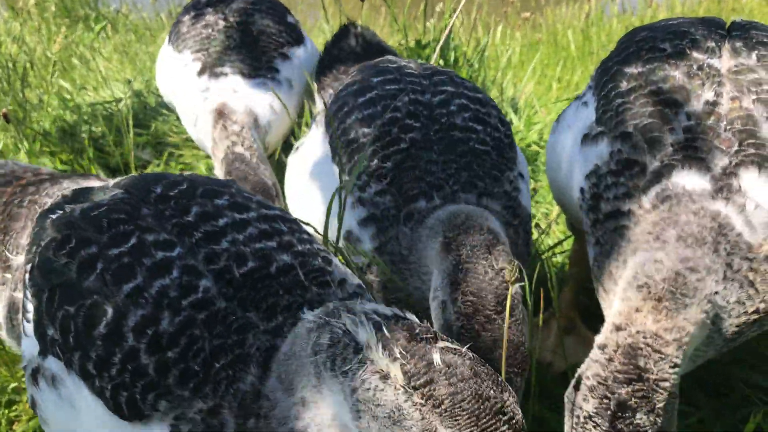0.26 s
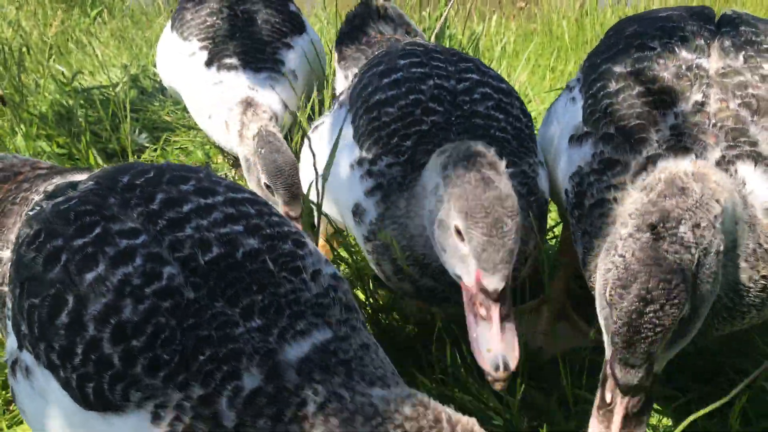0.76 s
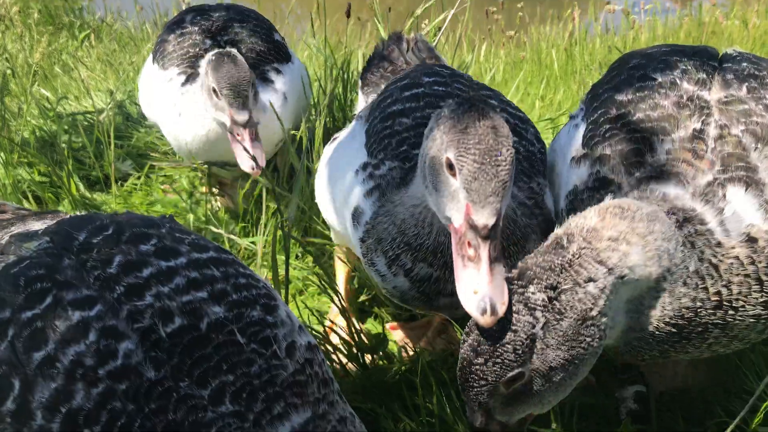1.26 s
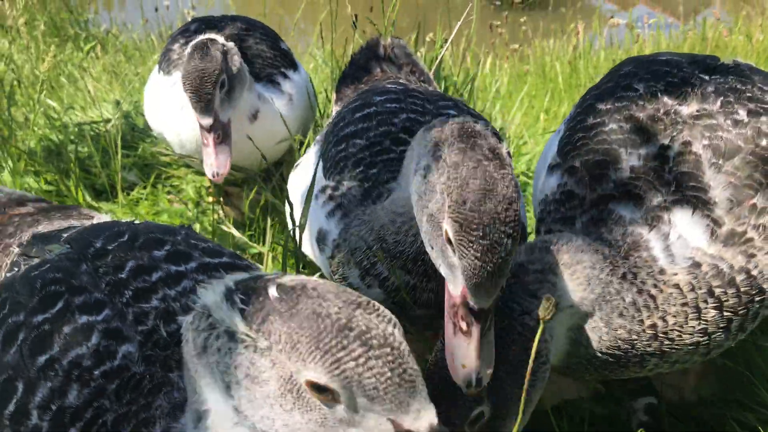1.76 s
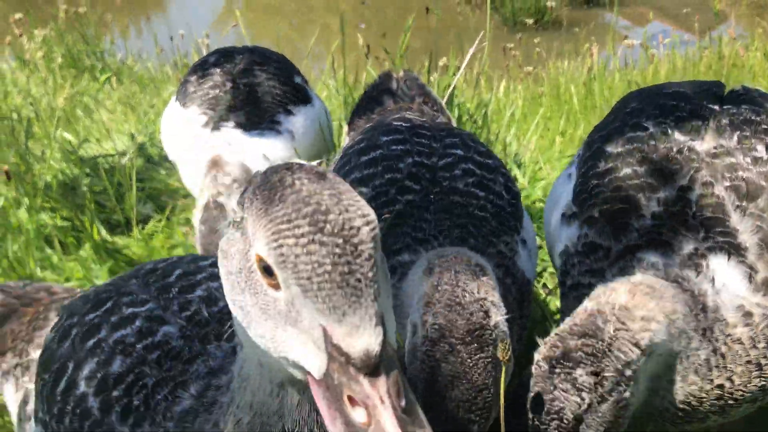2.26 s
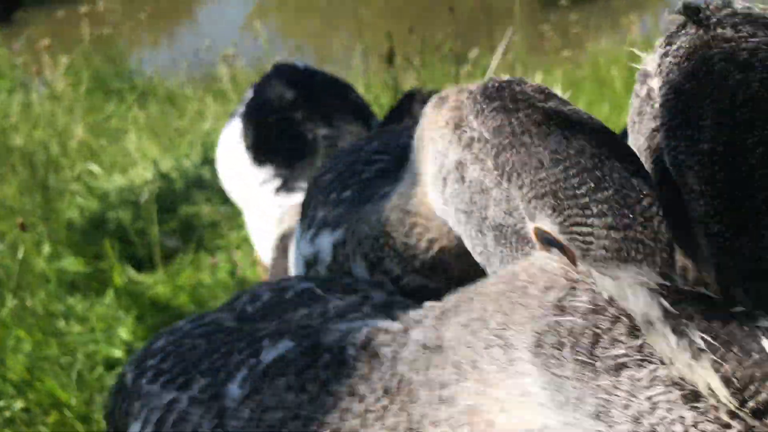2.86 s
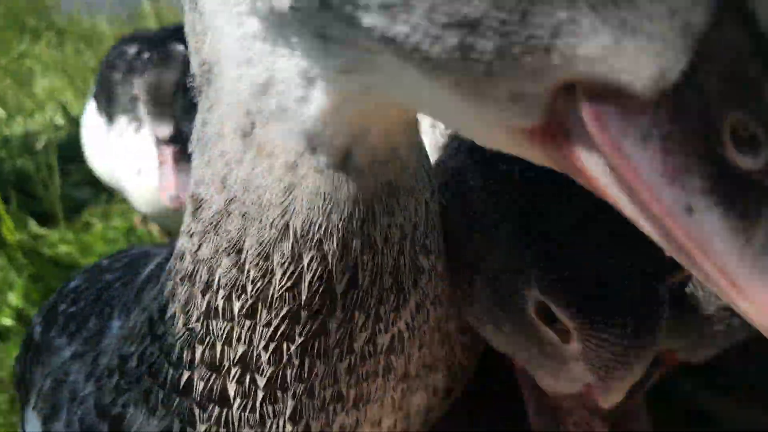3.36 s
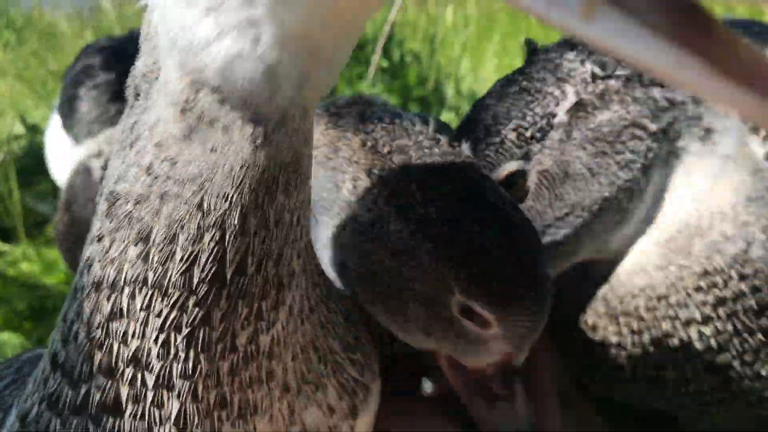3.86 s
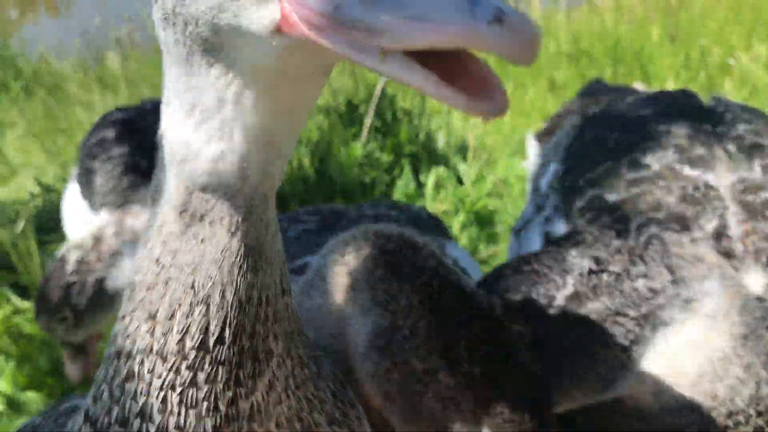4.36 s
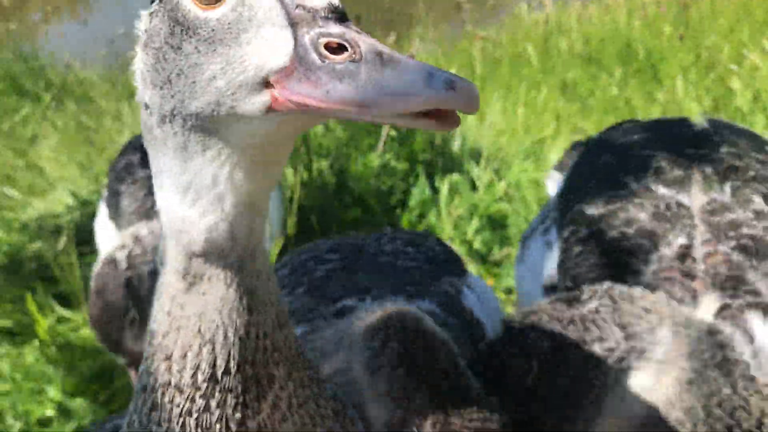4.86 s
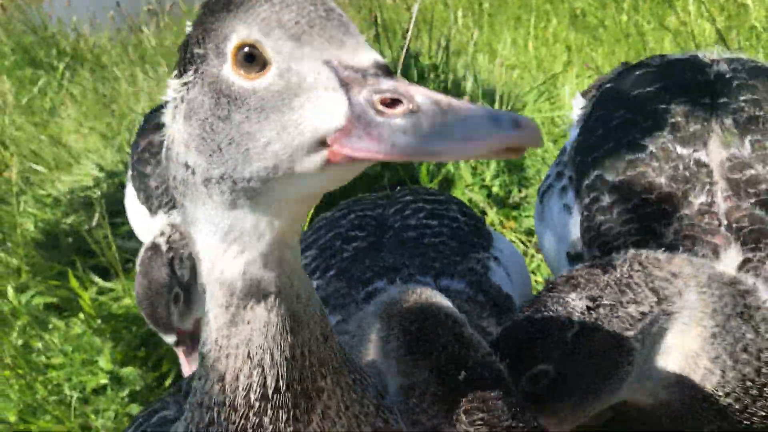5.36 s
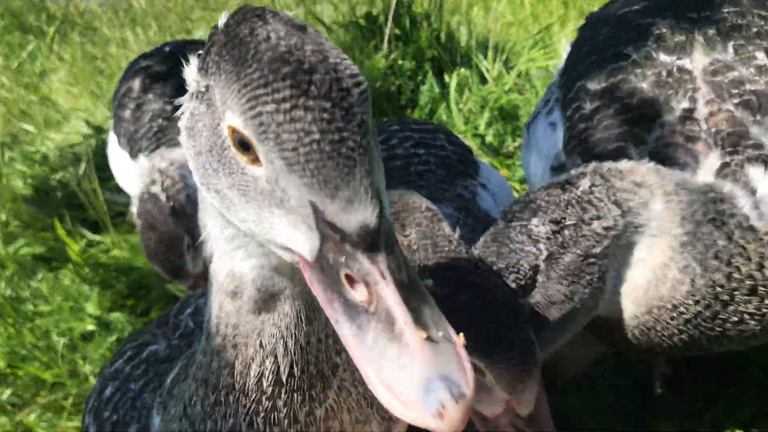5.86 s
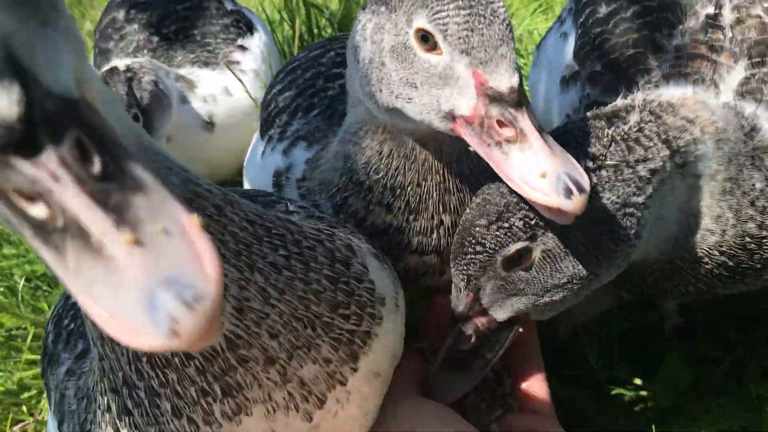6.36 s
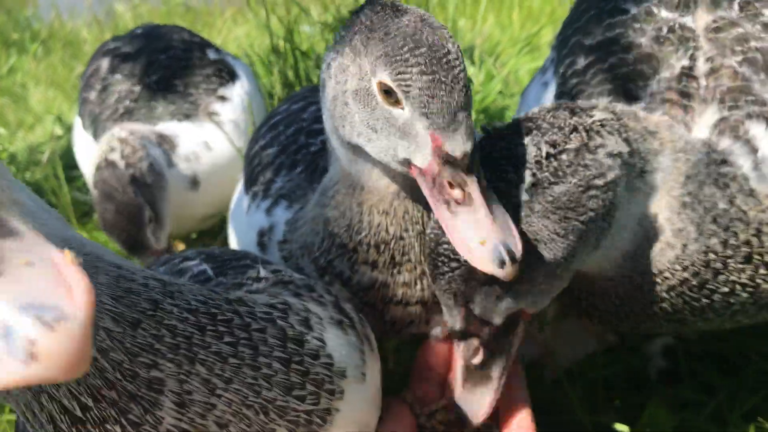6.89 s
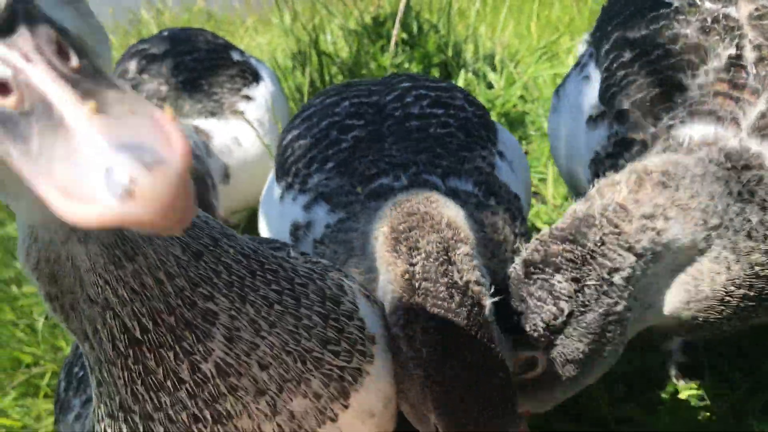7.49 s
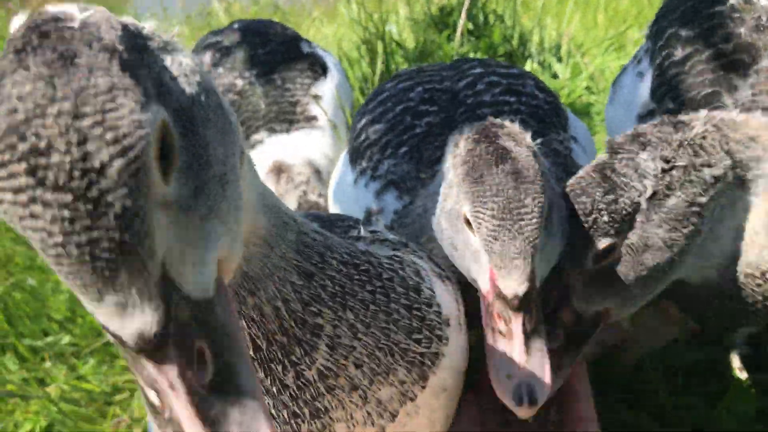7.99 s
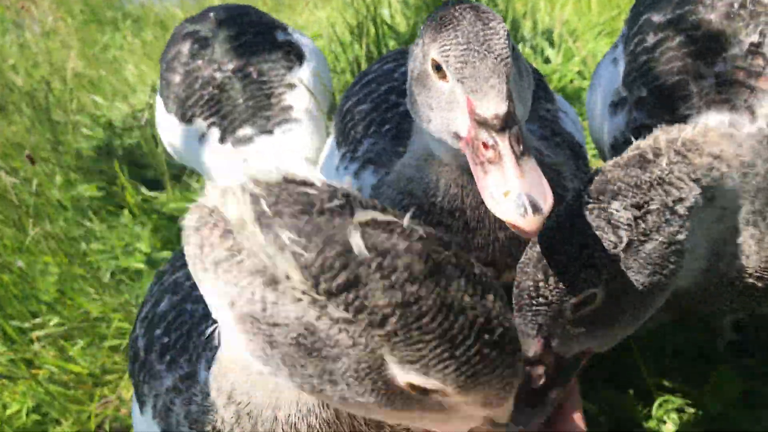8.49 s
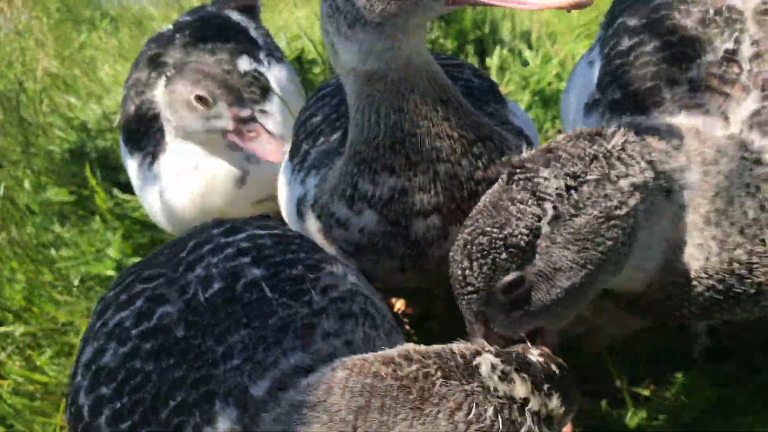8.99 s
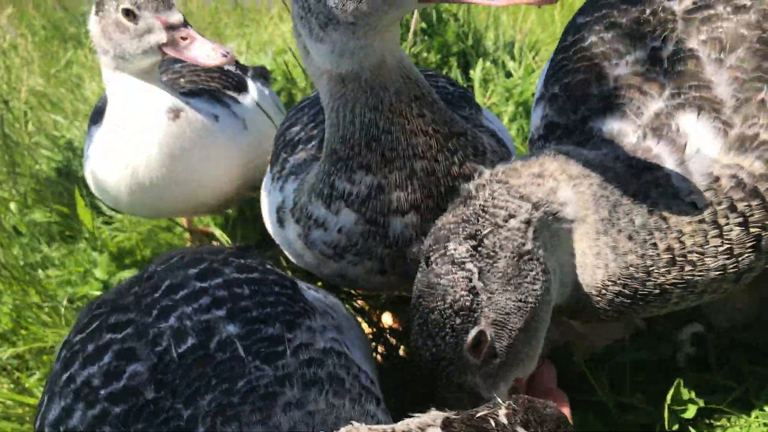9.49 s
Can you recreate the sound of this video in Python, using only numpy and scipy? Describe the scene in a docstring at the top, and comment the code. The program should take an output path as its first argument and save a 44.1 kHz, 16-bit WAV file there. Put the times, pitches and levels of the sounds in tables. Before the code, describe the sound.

Very close to the microphone, young ducks feed in grass beside a pond. At first there are only sparse ticks, faint nibbling and soft knocks, then a sudden dense burst of crackling, snapping stalks and wet bill pops, which goes on unevenly. Songbirds whistle, chirp and trill faintly behind in quiet open air. In the last second or so a duck beats its wings in quick, low fluttering thumps of air.

```python
"""Young ducks feeding on a pond bank

In the grass right at the microphone, young ducks feed: tufts crackle, stalks snap and blades ping as fibres give way
in random clicks, heard through the resonance of stalk and bill. Wet pops and dull knocks are short decaying tones.
Further off over a quiet meadow of shaped noise, birds sing in gliding near-sines with a diffuse echo.
Near the end one duck beats its wings: a fluttering tone in a rush of air on each stroke, over a low wake."""
import sys
import numpy as np
from scipy import signal
from scipy.fft import rfft, irfft
from scipy.io import wavfile

SR = 44100
rng = np.random.default_rng(int(sys.argv[2]) if len(sys.argv) > 2 else 0)


def inscribe(sig):
    """Save sig as 16-bit PCM at rate SR to the path in sys.argv[1].

    A 1-D sig is mono; a 2-D sig holds one channel per row.
    Samples are clipped to [-1, 1] before scaling.
    """
    pcm = np.round(np.clip(np.atleast_2d(sig).T, -1, 1) * 32767)
    wavfile.write(sys.argv[1], SR, pcm.astype(np.int16))


N = 429527
TIME = np.arange(N) / SR

# Open meadow hiss: (frequency [Hz], gain [dB])
MEADOW_COLOUR = [(20, -43), (35, -17), (55, 6), (100, -6), (200, -6), (330, -11.5), (550, -17.5),
                 (1000, -24), (1800, -19.5), (3200, -19), (5000, -16.5), (7500, -24.5), (12500, -24.5),
                 (16000, -18.5)]
# Low rumble of the breeze and shuffling bodies: (time [s], level [dB])
SHUFFLE_LEVELS = [(0.0, -68), (0.11, -64.5), (1.72, -74), (1.84, -64), (2.47, -68), (2.99, -58.5),
                  (5.44, -73.5), (5.46, -68), (5.58, -69.5), (8.45, -67.5)]
# Colour of that rumble: (frequency [Hz], gain [dB])
RUMBLE_COLOUR = [(30, -10.5), (60, 0.5), (120, 1.5), (280, -6), (500, -13), (900, -14), (2500, -50)]
# Faint low tones from far away: (time [s], length [s], pitch [Hz], level [dB])
FAR_TONES = [(0, 0.38, 443, -75), (6.754, 0.092, 504, -74), (9.334, 0.114, 498, -72.5)]

# Colour of a stalk's body: (frequency [Hz], gain [dB])
STALK_COLOUR = [(700, -20.5), (1400, -1), (2200, 3.5), (2800, 1), (3600, 2), (5500, -1), (7200, -3.5),
                (9000, -30.5)]
# Colour of its treble tick: (frequency [Hz], gain [dB])
TICK_COLOUR = [(5000, -38), (7300, -5.5), (9000, 2), (10400, -3.5), (11500, -1), (13000, -1), (14300, -6),
               (16000, -13.5)]
# Colour of the hollow of the mouth: (frequency [Hz], gain [dB])
HOLLOW_COLOUR = [(100, -12), (280, -3), (520, -5), (780, -0.5), (950, 1.5), (1090, 4), (1280, 1),
                 (1550, -2), (2200, -33)]
# Resonances of the grass fibres: (frequency [Hz])
FIBRE_HZ = [1100, 2200, 3300, 4500, 6200, 8600, 12000, 14500]
# Grass stirred by all the feeding ducks, before a fixed trim of each layer:
# (time [s], stalk crackle [dB], fine blades [dB], bills dabbling [dB])
STIR_LEVELS = [(0.0, -62, -63, -69.5), (0.68, -63.5, -63.5, -70), (1.49, -69.5, -66, -74),
               (2.09, -64.5, -59.5, -73.5), (2.44, -63.5, -67.5, -72), (2.6, -61, -66, -73),
               (2.77, -52.5, -58.5, -63), (3.12, -53.5, -60, -62.5), (3.31, -52, -55.5, -59.5),
               (3.53, -54.5, -58, -60), (4.83, -58, -63, -63.5), (5.13, -53.5, -60.5, -59.5),
               (5.45, -53, -61.5, -61.5), (5.99, -55, -59, -60), (6.29, -53.5, -56, -58.5),
               (6.48, -57, -55.5, -58.5), (7.16, -57.5, -59.5, -63), (7.57, -53.5, -64, -61),
               (8.14, -55, -61.5, -62.5), (8.57, -58.5, -64, -66), (8.95, -55, -62.5, -61.5),
               (9.74, -51.5, -65.5, -61.5)]
# The stirring comes in quick fits, and pauses between mouthfuls: rough spread in dB
FITS_DB, LULLS_DB = 3, 2.5

# Small wet pops in the dabbling bills, each at its own pitch
POPS_PER_S, POP_OVER_STIR_DB, POP_T60_S = 20, 8.5, 0.021
POP_HZ, POP_SPREAD_OCTAVES, POP_RISE_PER_S = 1410, 0.47, 18

# Lesser stalks snap at random, the louder the more the grass is stirred
STRAY_PER_S, STRAY_OVER_STIR_DB, STRAY_HZ, STRAY_TICK_DB = 5.4, 4, 3950, -4
# No two bites are alike: spread of level, resonance and treble tick
SPREAD_DB, SPREAD_OCTAVES, SPREAD_TICK_DB = 0.5, 0.47, 2.5

# A far bird twittering thinly, before a fixed trim: (start [s], end [s], level [dB])
TWITTER_SPELLS = [(.05, .9, -69), (1.05, 1.9, -69), (2.1, 2.6, -70), (3.9, 5.15, -65), (5.3, 6.3, -64),
                  (6.9, 7.3, -64), (7.8, 8.52, -63.5)]

# Single bites on tufts; the length sets the width of the swell:
# (time [s], length [s], level [dB], resonance [Hz], treble tick [dB])
BITES = [(0.148, 0.016, -59, 5870.0, -2), (0.688, 0.22, -68.5, 6400, 0), (2.615, 0.028, -48.5, 5730, -4.5),
         (2.81, 0.03, -62, 6000.0, -2), (2.846, 0.026, -49, 2310.0, -6.0), (2.879, 0.031, -53, 2640.0, -4),
         (2.991, 0.012, -46.0, 4360.0, -8.5), (3.037, 0.025, -52.0, 2410.0, -6.0),
         (3.082, 0.032, -51.5, 3400, -9), (3.136, 0.015, -50.5, 4200.0, -3),
         (3.205, 0.042, -56, 3930.0, -7), (3.245, 0.065, -56.0, 3900, -5), (3.305, 0.066, -60, 3800.0, -5),
         (3.342, 0.041, -53, 2860, -7.5), (3.429, 0.04, -51.5, 3100.0, -7), (3.492, 0.029, -56, 4030, -2),
         (3.515, 0.036, -51.0, 3100, -4.5), (3.623, 0.018, -52, 5200.0, -8),
         (3.725, 0.045, -55.5, 4700.0, -8), (3.8, 0.058, -62, 3580, -12), (3.915, 0.017, -62.5, 3500.0, 2),
         (3.956, 0.015, -69, 3500.0, -10.0), (4.123, 0.016, -60, 3500.0, -7.0),
         (4.161, 0.022, -61.5, 6500.0, 0), (4.211, 0.026, -62, 1600.0, -6.0),
         (4.381, 0.01, -52, 4300.0, -4), (4.517, 0.019, -61.5, 4200.0, -8),
         (4.568, 0.022, -61.0, 1600.0, -6), (4.634, 0.019, -58.0, 4100.0, -4),
         (4.836, 0.028, -56, 3800.0, -8), (4.918, 0.013, -60.0, 5000.0, -7),
         (5.089, 0.012, -57.0, 4300.0, -12.0), (5.17, 0.029, -56.5, 3300.0, -10.0),
         (5.351, 0.027, -56, 4300.0, -15), (5.442, 0.018, -60.0, 2600.0, -15.0),
         (5.477, 0.021, -63, 3100.0, -14), (5.661, 0.031, -60.5, 4400.0, -8.0),
         (5.8, 0.016, -64, 1600.0, -9), (5.945, 0.016, -60.0, 1600.0, -14),
         (5.987, 0.021, -60, 2900.0, -8.0), (6.032, 0.032, -58.5, 3800.0, -9),
         (6.097, 0.018, -59, 3300.0, -8.0), (6.132, 0.033, -60, 4500.0, -10.0),
         (6.231, 0.014, -57, 3600.0, -2), (6.265, 0.023, -55.0, 3370, -8.0),
         (6.328, 0.012, -55.5, 5700.0, 2.0), (6.372, 0.024, -54.0, 3100.0, -4),
         (6.465, 0.019, -57.5, 3100.0, -6), (6.511, 0.024, -58.5, 1600.0, -7),
         (6.605, 0.028, -63, 4300.0, -5.0), (6.747, 0.017, -60, 5900.0, -18.0),
         (6.784, 0.014, -63, 4600.0, -4.0), (6.875, 0.018, -59.5, 3600.0, -7.0),
         (6.976, 0.03, -59, 3720, -10), (7.084, 0.022, -58.0, 6400.0, -2), (7.193, 0.01, -58, 5300.0, -2),
         (7.516, 0.027, -63.0, 4700.0, -6), (7.794, 0.02, -55, 3700.0, -8.0),
         (7.892, 0.018, -57, 3400.0, -21), (7.953, 0.029, -63, 4500.0, -5), (8.078, 0.04, -66, 5100.0, -6),
         (8.183, 0.048, -64, 5800.0, -11), (8.323, 0.029, -58.5, 5600.0, -1.5),
         (9.28, 0.015, -59.0, 1600.0, -11.0), (9.374, 0.018, -61, 2700.0, -6),
         (9.608, 0.021, -58.5, 1900.0, -5)]
# Bouts of nibbling at a nearly even pace; usual level, resonance and tick, scattered from bite to bite:
# (first bite [s], end [s], rate [bites/s], level [dB], resonance [Hz], treble tick [dB])
BOUTS = [(0.483, 1.03, 10.9, -68, 5200, -4), (1.339, 1.82, 8.3, -75, 3330, 4),
         (1.944, 2.33, 8.6, -66, 4355, -5)]
BITE_S, BITE_HOLLOW_DB, BITE_JITTER_S = 0.02, -11.5, .003

# The loudest bill clacks and snapping stalks: (time [s], level [dB], resonance [Hz], treble tick [dB])
SNAPS = [(0.1493, -44.5, 6050, -1), (0.162, -51, 5570, 4), (0.244, -44, 6940, -12), (0.2671, -45, 7210, -4),
         (0.7363, -49.5, 4030, -7), (.767, -51, 5800, -9), (0.981, -52, 6670, -3), (1.019, -51, 4070, -13),
         (1.842, -51, 5900, -10), (1.856, -57, 7520, 6), (2.1584, -56, 5000, -1), (2.2039, -52, 7400, -4),
         (2.594, -47, 5860, -8), (2.615, -32.5, 3330, -9), (2.63, -44, 6500, 3), (2.675, -43.5, 4200, -9),
         (2.6912, -44.5, 5570, -9), (2.711, -41, 4300, -8), (2.738, -51, 4000, -14),
         (2.759, -44, 4200, -10), (2.7634, -43, 6220, -13), (2.8298, -36.5, 4270, -11),
         (2.868, -37, 6000, 0), (2.8775, -36, 4130, -5), (2.8829, -34, 2530, -15), (2.8901, -36, 2270, -13),
         (2.898, -33.5, 4520, -9), (2.9417, -50, 6300, -8), (2.9785, -39.5, 4520, -17),
         (2.987, -48, 3600, -15), (2.992, -41, 3000, -22), (3.017, -47, 5100, -6), (3.0386, -41, 2350, 4),
         (3.0464, -39, 3450, -12), (3.0785, -42, 3560, -14), (3.0865, -43, 3500, -20),
         (3.0943, -40, 3500, -21), (3.136, -37.5, 5660, -4), (3.143, -35, 3380, -18),
         (3.161, -41, 3630, -22), (3.1696, -54, 6000, 5), (3.222, -48, 5800, -10), (3.2346, -43, 3870, -20),
         (3.2722, -41, 4300, -9), (3.283, -47, 4200, -3), (3.3383, -43, 4010, -18), (3.346, -48, 3200, -13),
         (3.3596, -48, 3800, -16), (3.3714, -51, 3000, -16), (3.411, -49, 3400, -8),
         (3.4227, -34.5, 3030, -4), (3.4834, -46.5, 3820, 7.5), (3.529, -39, 2950, -8),
         (3.623, -42.5, 5270, 0), (3.579, -50, 4500, -7), (3.6308, -52, 4500, -14),
         (3.653, -41.5, 3900, -11), (3.6655, -56, 5000, -4), (3.6962, -51, 5770, -15),
         (3.7264, -49, 4640, -10), (3.7698, -46, 3520, -22), (3.8002, -45.5, 1820, -22),
         (3.891, -46, 3680, -18), (3.954, -48, 1720, -14), (3.899, -41.5, 3600, -18),
         (4.0177, -44.5, 6300, -8), (4.026, -44.5, 4840, -2), (4.052, -47, 4000, -15),
         (4.118, -45.5, 3800, -5), (4.173, -49, 7400, -1), (4.2117, -39.5, 1560, -2),
         (4.3413, -42.5, 3540, -7), (4.3708, -47, 4750, -6), (4.379, -44.5, 4070, -2),
         (4.634, -44.5, 4200, -5), (4.837, -47, 3850, -17), (4.92, -51, 5200, 1), (4.933, -39.5, 1520, -5),
         (4.9666, -43, 3270, -14), (4.9898, -34.5, 3880, -15), (5.0483, -39.5, 4280, -18),
         (5.0632, -45.5, 1880, -6), (5.0874, -46.5, 2310, -18), (5.1478, -52, 4000, -5),
         (5.283, -44, 2704, -6), (5.309, -43, 4070, -16), (5.3213, -47, 4800, -5), (5.3479, -49, 3830, -20),
         (5.3692, -49, 3000, -16), (5.463, -49.5, 5400, -4), (5.554, -47, 5150, -15),
         (5.596, -48.5, 2670, -10), (5.6445, -46.5, 4450, -19), (5.7364, -49, 5800, -9),
         (5.749, -38, 4030, -26), (5.8022, -48, 1600, -9), (5.8343, -47, 3800, -12),
         (5.8587, -45, 5000, -8), (5.945, -47, 1690, -16), (5.9817, -47.5, 2700, -14),
         (6.0304, -45, 3500, -16), (6.0973, -49, 2180, -1), (6.1327, -43.5, 3190, -2.5),
         (6.195, -39.5, 2900, -8), (6.23, -48.5, 3620, -4), (6.2632, -38, 3100, -19), (6.324, -49, 3460, 2),
         (6.3551, -42, 2730, -11), (6.433, -49, 1700, -14), (6.444, -45, 3700, -11),
         (6.466, -46, 3040, -13), (6.53, -47.5, 2600, -8), (6.6023, -48, 4100, -2), (6.615, -50, 3900, -13),
         (6.712, -43.5, 5510, -3), (6.717, -45, 2800, -20), (6.7403, -44, 5940, -14),
         (6.7814, -47, 5570, -3), (6.844, -43, 1972, -18), (6.9147, -48, 4400, -2), (7.047, -45, 3550, -5),
         (7.086, -39, 5620, -11), (7.1318, -46.5, 3150, -15), (7.161, -42.5, 3600, -26),
         (7.19, -49.5, 4500, 3), (7.303, -46, 4450, -16), (7.319, -41, 3120, -10),
         (7.335, -40.5, 3370, -14), (7.4352, -42, 6200, -10), (7.5297, -39.5, 2430, -18),
         (7.5816, -48, 3700, -17), (7.672, -40, 3400, -12), (7.698, -45, 3870, -22), (7.7609, -47, 5600, 0),
         (7.778, -46, 3700, -17), (7.8562, -45.5, 3980, 2), (7.8641, -46, 5700, -1),
         (7.8884, -45, 2437, -24), (7.981, -46.5, 3460, -17), (8.123, -48, 3700, -8), (8.18, -50, 5550, -3),
         (8.2454, -24.5, 4500, -9.5), (8.3488, -48, 3800, -8), (8.405, -42, 3500, -24),
         (8.9473, -45.5, 5640, -12), (9.2188, -40.5, 3740, -13), (9.2598, -45, 4750, -15),
         (9.321, -44, 4090, -7), (9.3592, -39.5, 3820, -29), (9.3749, -43.5, 2560, -9),
         (9.4048, -47, 3850, -22), (9.433, -34.5, 3330, -33), (9.4393, -49, 3000, -17),
         (9.498, -38, 3740, -30), (9.5873, -39, 2480, -25), (9.6092, -42, 2490, -18),
         (9.711, -41, 1620, -7)]
# The hollow of the bill under a snap: strong for dull clacks, faint for thin high stalks
SNAP_HOLLOW_DB, SNAP_HOLLOW_HZ, HOLLOW_FALL_DB_PER_OCTAVE = -19, 3900, 13.5
# Hard snaps break cleaner (fewer splinters, a broader ring, less hollow): (onset of this [dB], full effect [dB])
CLEAN_BREAK_DB = (-40, -26)

# Thin blades that part with a high ping and no body: (time [s], level [dB], pitch [Hz])
PINGS = [(0.331, -48, 12360), (0.3403, -40.5, 11800), (.3524, -51, 12360), (0.3611, -35.5, 11800),
         (0.3887, -39.5, 12000), (1.8896, -48, 8900), (2.1354, -52, 10700), (4.24, -42.5, 9400),
         (4.2448, -42, 14500), (4.405, -42.5, 8150), (4.4533, -49, 15000), (4.4673, -42, 7900),
         (4.6997, -48, 12830), (5.8468, -42.5, 11700), (6.273, -36.5, 11900), (6.3182, -48, 13650),
         (6.34, -42, 12500), (6.5485, -47, 12900), (7.1715, -40, 11900), (7.272, -44, 9000),
         (7.5675, -45.5, 8900), (8.4468, -47.5, 9000)]
PING_WIDTH_HZ = 1800

# The nearer songbird notes: (time [s], length [s], first [Hz], middle [Hz], last [Hz], level [dB])
WHISTLES = [(0.362, 0.12, 2410, 2364, 2390, -68), (1.239, 0.084, 3800, 3860, 3800, -69.5),
            (1.407, 0.048, 3380, 3150, 2800, -70), (1.442, .04, 3400, 3620, 3650, -70),
            (1.65, 0.027, 3470, 3170, 2900, -74), (1.664, 0.05, 2850, 2600, 2880, -70),
            (1.701, 0.034, 4000, 3850, 3500, -64), (1.722, 0.049, 3230, 2760, 2600, -66),
            (1.905, 0.053, 4450, 4400, 4680, -61.5), (2.027, 0.095, 2960, 2850, 2400, -69),
            (2.21, 0.074, 3820, 3380, 3030, -64), (2.286, 0.052, 2600, 2760, 2750, -63.5),
            (2.445, .16, 1900, 2090, 1925, -71), (2.5, .06, 3050, 3060, 3140, -69),
            (2.589, 0.17, 2130, 2265, 1960, -62), (2.767, 0.089, 2140, 2210, 2300, -61),
            (3.282, 0.061, 3840, 3650, 3380, -57), (3.674, 0.09, 2410, 2640, 2770, -62.5),
            (3.8, 0.19, 3370, 3490, 3480, -61), (4.09, 0.07, 3400, 3230, 3200, -62),
            (4.993, 0.079, 3480, 3000, 3100, -59.5), (5.165, 0.061, 2790, 3020, 2850, -57.5),
            (5.233, 0.088, 2580, 2440, 2640, -59), (5.407, .065, 2515, 2490, 2880, -62.5),
            (5.453, 0.072, 2670, 3160, 3600, -62), (5.596, 0.033, 3300, 3050, 2850, -65),
            (5.682, 0.041, 3956, 3780, 3720, -60), (6.091, 0.026, 3590, 3350, 2950, -62),
            (6.223, 0.034, 3720, 3550, 3200, -56), (7.157, 0.034, 3620, 3150, 2650, -56),
            (7.232, 0.11, 2457, 3290, 3160, -54.5), (7.215, .06, 3800, 3680, 3680, -71),
            (7.397, .06, 3130, 2950, 2700, -56.5), (8.23, 0.041, 3280, 3130, 2900, -62),
            (8.58, 0.056, 2820, 2790, 2850, -68), (8.726, 0.049, 4120, 3790, 3640, -62)]
# A run of quick rising pips ahead of the trill
PIPS_START_S, PIP_PERIOD_S, PIP_DB = 5.754, .0535, -63
# The course of one pip: (time from its start [s], pitch [Hz], relative level [dB])
PIP_COURSE = [(0, 3580, -5), (.008, 3990, 4), (.02, 4400, 4)]
# A songbird's trill: one syllable repeated evenly
TRILL_START_S, TRILL_PERIOD_S, TRILL_DB = 6.333, .122, -58
# The course of one syllable, down, up and down again: (time from its start [s], pitch [Hz], relative level [dB])
SYLLABLE_COURSE = [(0, 3230, 11), (.008, 3053, 2), (.017, 2607, -3), (.02, 3090, -10), (.025, 3710, 2),
                   (.033, 4640, 4), (.042, 5215, 2), (.0445, 5253, -22), (.048, 4110, 4), (.057, 3370, 5),
                   (.068, 2413, 0)]

# Dull knocks of feet and bills on the ground, and a few soft brushes of feathers, before a fixed trim: (time
# [s], level [dB], pitch [Hz])
KNOCKS = [(0.63, -46.5, 403), (.648, -47.5, 358), (1.8044, -45.5, 910), (1.808, -46, 527),
          (1.808, -45, 336), (1.821, -51, 680), (1.887, -51.5, 213), (1.91, -49, 180), (3.015, -49, 258),
          (3.033, -46, 830), (3.152, -49, 700), (3.224, -43, 141), (3.337, -47, 320), (3.522, -51, 300),
          (4.211, -41, 1080), (4.212, -53, 312), (4.932, -43, 750), (5.944, -44, 1010), (6.515, -39, 1070),
          (7.132, -45.5, 900), (7.887, -54, 267.4)]
KNOCK_T60_S = 0.026

# Sparrow chirps, before a fixed trim of the main voice: (time [s], level [dB])
CHIRPS = [(1.122, -61), (2.399, -56.5), (5.185, -58), (6.116, -58), (7.311, -54.5), (8.333, -57)]
# The course of one chirp: (time from its start [s], pitch [Hz], relative level [dB])
CHIRP_COURSE = [(0, 3040, -8), (.010, 3214, -5), (.014, 3796, 6), (.017, 4740, -4), (.036, 4760, -2.5),
                (.041, 3724, 8), (.048, 2643, -11), (.055, 3670, 9), (0.061, 2750, -15), (.068, 3680, 5),
                (.08, 3485, 5), (.094, 2910, -7), (.107, 2430, -1)]
# The second, lower voice in a chirp
UNDER_VOICE_RATIO, UNDER_VOICE_DB = .8, -11.5

# Wing strokes; flutter level before a fixed trim, the length sets the width of the flutter:
# (time [s], flutter level [dB], length [s], flutter pitch [Hz], rush of air [dB])
STROKES = [(8.56, -55, 0.035, 236.5, -51.5), (8.685, -31, 0.022, 227, -45.5),
           (8.837, -35, 0.019, 243.6, -41), (8.991, -31.5, 0.018, 221.4, -41.5),
           (9.135, -34, 0.017, 212, -42.5), (9.287, -32, 0.019, 224.7, -44),
           (9.433, -33, 0.0114, 237.7, -42), (9.574, -49, 0.012, 286, -43),
           (9.72, -37.5, 0.014, 240, -42.5)]
# Colour of the rush of air: (frequency [Hz], gain [dB])
RUSH_COLOUR = [(50, -4.5), (140, -13), (230, -0.5), (340, -1.5), (450, -15.5), (700, -26), (1200, -22.5),
               (3000, -40.5)]
# Colour of the low wake: (frequency [Hz], gain [dB])
WAKE_COLOUR = [(25, -23), (45, 1.5), (68, 4), (100, 3), (140, -7.5), (210, 1.5), (330, -6.5), (430, -16),
               (800, -28), (2000, -38)]
# Feathers rasp on each stroke: level against the rush of air, centre, width of each of two resonances
RASP_DB, RASP_HZ, RASP_WIDTH_HZ = -13.5, 1790, 1800

TOP_HZ = 15950


def undb(db):
    """Amplitude factor of a level in dB."""
    return 10 ** (np.asarray(db) / 20)


def unit(x):
    """Scale to rms 1."""
    return x / np.sqrt(np.mean(x ** 2) + 1e-30)


def lasting(x, seconds):
    """Scale a burst to the energy of rms 1 held for so long."""
    return x * np.sqrt(seconds * SR / (np.sum(x ** 2) + 1e-30))


def add(out, s, x):
    """Mix x into out from time s on."""
    i = int(round(s * SR))
    x, i = x[max(-i, 0):], max(i, 0)
    out[i:i + len(x)] += x[:max(len(out) - i, 0)]


def response(points, size=512):
    """Minimum-phase impulse response of a (frequency [Hz], gain [dB]) colour, by way of its cepstrum."""
    hz, db = np.transpose(points)
    bins_hz = np.fft.rfftfreq(size, 1 / SR)
    gain_db = np.interp(np.log(bins_hz + 1), np.log(hz), db)
    cepstrum = irfft(np.log(undb(gain_db)))
    # fold the second half onto the first, so that nothing sounds ahead of time 0
    cepstrum[1:size // 2] *= 2
    cepstrum[size // 2 + 1:] = 0
    return irfft(np.exp(rfft(cepstrum)))


def through(x, h):
    """Pass x through an impulse response."""
    return signal.fftconvolve(x, h)[:len(x)]


def noise(points):
    """Coloured noise of rms 1."""
    return unit(through(rng.standard_normal(N), response(points, size=8192)))


def ring(x, hz, width_hz):
    """One resonance, held below the top of the band."""
    b, a = signal.iirpeak(min(hz, SR * 3 / 8), hz / min(width_hz, SR / 5), fs=SR)
    return signal.lfilter(b, a, x)


def walk(rate, count=N):
    """Random wander along straight lines between `rate` new values a second; spread near 1."""
    at = np.arange(count) / SR * rate
    knots = int(at[-1]) + 2
    return 1.46 * np.interp(at, np.arange(knots), rng.standard_normal(knots))


def meadow():
    """Faint open-air hiss, and a low rumble that swells and sinks."""
    s, db = np.transpose(SHUFFLE_LEVELS)
    hiss = undb(-62.5 + 1.34 * walk(3.7)) * noise(MEADOW_COLOUR)
    rumble = undb(np.interp(TIME, s, db) + 2 * walk(18)) * noise(RUMBLE_COLOUR)
    return hiss + rumble


def tone(hz, db, waver):
    """A near-sine voice, slightly unsteady in pitch and level, with soft ends."""
    count = len(hz)
    phase = 2 * np.pi * np.cumsum(hz * (1 + waver * walk(357.4, count=count))) / SR
    level = undb(db + 2 * walk(70, count=count))
    return np.sqrt(2) * np.sin(phase) * level * signal.windows.tukey(count, .25)


def scatter(x, seconds):
    """Diffuse echo from the trees and banks round the pond: noise that dies away exponentially."""
    t = np.arange(SR // 2) / SR
    tail = rng.standard_normal(len(t)) * np.exp(-t / seconds) * (1 - np.exp(-t / 0.0018))
    return through(x, lasting(tail, 1 / SR))


def far_tones():
    """Soft low tones with unsteady pitch, blurred by an echo stronger than themselves."""
    out = np.zeros(N)
    for s, length, hz, db in FAR_TONES:
        add(out, s, tone(np.full(int(length * SR), hz), db, waver=0.1204))
    return out + undb(6.5) * scatter(out, 0.047)


def fibres(count, rate, spread_db):
    """Fibres giving way at random, as single-sample clicks of either sign and scattered strength."""
    sizes = undb(spread_db * np.minimum(rng.exponential(size=count), 5))
    return (rng.random(count) < rate / SR) * sizes * rng.choice([-1, 1], count)


def crackle(count, rate, spread_db):
    """Broad clicks, among clicks that each ring briefly at the pitch of one fibre."""
    pitched = sum(ring(fibres(count, rate / 4, spread_db), hz, 0.46 * hz) for hz in FIBRE_HZ)
    return pitched + 0.36 * fibres(count, rate, spread_db)


def stirred_grass(colours):
    """Blades rub on each other and on feathers: a crackle in fits and lulls, with lone ticks of single blades."""
    s, *levels = np.transpose(STIR_LEVELS)
    fits = undb(FITS_DB * walk(130) + LULLS_DB * np.minimum(walk(28), 1))
    shared = crackle(N, rate=900, spread_db=3.4)
    ticks = unit(sum(ring(fibres(N, rate=14, spread_db=2.4), hz, .16 * hz) for hz in FIBRE_HZ[1:]))
    out = np.zeros(N)
    for h, db, trim_db in zip(colours, levels, (-4.7, -3.3, -1)):
        rubbing = unit(fits * (shared + .7 * crackle(N, rate=900, spread_db=3.4)))
        coloured = unit(through(rubbing + 0.48 * ticks, h))
        out += coloured * undb(np.interp(TIME, s, db) + trim_db)
    return out


def pops():
    """Films of sap burst in the bills: brief decaying tones that rise a little in pitch."""
    s, *_, dabbling_db = np.transpose(STIR_LEVELS)
    out, t = np.zeros(N), np.arange(SR // 50) / SR
    shape = undb(-60 * t / POP_T60_S) * (1 - np.exp(-t / .0004))
    for at in rng.uniform(0, N / SR, int(POPS_PER_S * N / SR)):
        loud, pitch = np.clip(rng.standard_normal(2), -2, 2)
        hz = POP_HZ * 2 ** (POP_SPREAD_OCTAVES * pitch) * (1 + POP_RISE_PER_S * t)
        db = np.interp(at, s, dabbling_db) + POP_OVER_STIR_DB + 3 * loud
        add(out, at, undb(db) * shape * np.sin(2 * np.pi * np.cumsum(hz) / SR))
    return out


def vary(db, hz, tick_db):
    """Level, resonance and treble tick of one bite, scattered round the usual."""
    loud, pitch, bright = np.clip(rng.standard_normal(3), -2, 2)
    return db + SPREAD_DB * loud, hz * 2 ** (SPREAD_OCTAVES * pitch), tick_db + SPREAD_TICK_DB * bright


def strays():
    """Lesser snaps at random moments: rows like those of SNAPS."""
    s, stalk_db = np.transpose(STIR_LEVELS)[:2]
    rows = []
    for at in rng.uniform(0, N / SR, int(STRAY_PER_S * N / SR)):
        usual_db = np.interp(at, s, stalk_db) + STRAY_OVER_STIR_DB
        rows.append((at, *vary(usual_db, STRAY_HZ, STRAY_TICK_DB)))
    return rows


def twitter():
    """A distant thin chatter of quick falling notes on two close pitches, with its echo."""
    out = np.zeros(N)
    for start, end, db in TWITTER_SPELLS:
        for s in np.arange(start, end, .022):
            late, pitch, loud = rng.standard_normal(3)
            hz = (5190 if rng.random() < .6 else 4880) * (1 + .01 * pitch)
            glide = np.linspace(hz + 100, hz - 100, SR // 75)
            add(out, s + .006 * late, tone(glide, db - 2 + 2 * loud, waver=0.012))
    return out + undb(-13) * scatter(out, .04)


def bill(push, colours, seconds, hz, tick_db, hollow_db, damping, plain_db):
    """A push heard through a stalk held in the bill: its resonance, a treble tick, and the hollow of the mouth."""
    stalk, tick, hollow = (through(push, h) for h in colours)
    body = lasting(ring(stalk, hz, hz * damping) + undb(plain_db) * stalk, seconds)
    return body + undb(tick_db) * lasting(tick, seconds) + undb(hollow_db) * lasting(hollow, seconds)


def crush(colours, rows, hollow_db):
    """The bill closes on a tuft: the crackle swells and dies within a few hundredths of a second."""
    out = np.zeros(N)
    t = np.arange(-3000, 3000) / SR
    for s, length, db, hz, tick_db in rows:
        swell = np.exp(-np.abs(t / (0.55 * length)) ** 1.6)
        push = crackle(len(t), rate=1200, spread_db=4.8) * swell
        bite = bill(push, colours, 2.93 * length, hz, tick_db, hollow_db, damping=0.25, plain_db=-4.5)
        add(out, s + t[0], undb(db) * bite)
    return out


def nibbling():
    """Each bout as a run of slightly uneven bites: rows like those of BITES."""
    rows = []
    for start, end, rate, db, hz, tick_db in BOUTS:
        for s in np.arange(start, end, 1 / rate):
            moment = s + BITE_JITTER_S * rng.standard_normal()
            length = BITE_S * 2 ** rng.uniform(-0.55, 0.78)
            rows.append((moment, length, *vary(db, hz, tick_db)))
    return rows


def nibbles(colours):
    """Single bites on whole tufts, and faint, nearly even nibbling further back."""
    return crush(colours, BITES + nibbling(), BITE_HOLLOW_DB)


def snaps(colours, rows):
    """A stalk breaks at one instant, with a few fibres tearing just before and after it."""
    out, lead = np.zeros(N), 256
    t = (np.arange(1400) - lead) / SR
    tearing = (t > 0) * np.exp(-np.abs(t) / 0.0012) + 0.09 * np.exp(-np.abs(t) / 0.0029)
    for s, db, hz, tick_db in rows:
        splinters = fibres(len(t), 25000, 0.71) * tearing
        clean = np.interp(db, CLEAN_BREAK_DB, (0, 1))
        push = (.95 - .6 * clean) * lasting(splinters, 1 / SR)
        push[lead] += 1  # the break itself
        push = push + 2 * ring(push, rng.uniform(8600, 16800), 7300)  # every stalk ticks at its own pitch
        octaves = np.log2(hz / SNAP_HOLLOW_HZ)
        hollow_db = SNAP_HOLLOW_DB - HOLLOW_FALL_DB_PER_OCTAVE * octaves - 12 * clean
        snap = bill(push, colours, 0.002, hz, tick_db, hollow_db, damping=0.16 + 0.18 * clean, plain_db=-13.5)
        add(out, s + t[0], undb(db) * snap)
    return out


def pings():
    """A taut blade parts in a few quick jerks and rings at its one high pitch."""
    out, t = np.zeros(N), np.arange(SR // 50) / SR
    for s, db, hz in PINGS:
        push = 1.8 * lasting(fibres(len(t), 25000, 0.51) * np.exp(-t / 0.001), 1 / SR)
        push[0] += 1
        add(out, s, undb(db) * lasting(ring(push, hz, PING_WIDTH_HZ), 0.0022))
    return out


def phrase(course, db, waver):
    """A call that follows a course of pitch and level."""
    at, hz, shape_db = np.transpose(course)
    t = np.arange(int(at[-1] * SR)) / SR
    return tone(np.interp(t, at, hz), db + np.interp(t, at, shape_db), waver)


def beats(start, period, count):
    """Evenly spaced moments."""
    return start + period * np.arange(count)


def songbirds():
    """Whistled notes on curved glides, a run of pips and a quick trill, with a faint echo from the banks."""
    out = np.zeros(N)
    for s, length, first_hz, middle_hz, last_hz, db in WHISTLES:
        curve = np.polyfit([0, .5, 1], [first_hz, middle_hz, last_hz], 2)
        glide = np.polyval(curve, np.linspace(0, 1, int(length * SR)))
        add(out, s, tone(glide, db, waver=.011))
    for s in beats(PIPS_START_S, PIP_PERIOD_S, count=5):
        add(out, s, phrase(PIP_COURSE, PIP_DB, waver=0.0077))
    for s in beats(TRILL_START_S, TRILL_PERIOD_S, count=6):
        add(out, s, phrase(SYLLABLE_COURSE, TRILL_DB, waver=0.011))
    return out + undb(-10) * scatter(out, 0.04)


def knocks():
    """Soft blows on turf and dull brushes of feathers: a sine and a band of noise at one pitch, quickly damped."""
    out, t = np.zeros(N), np.arange(SR // 6) / SR
    shape = undb(-60 * t / KNOCK_T60_S) * (1 - np.exp(-t / 0.00039))
    for s, db, hz in KNOCKS:
        rough = unit(ring(ring(rng.standard_normal(len(t)), hz, 1.7 * hz), hz, 2.0 * hz))
        thud = np.sin(2 * np.pi * hz * t) + .5 * rough
        add(out, s, undb(db + 3.5) * thud * shape)
    return out


def sparrows():
    """Rough chirps that leap and fall: the two sides of the syrinx sing apart, and leaves smear the result."""
    out = np.zeros(N)
    under_voice = [(t, UNDER_VOICE_RATIO * hz, db) for t, hz, db in CHIRP_COURSE]
    for s, db in CHIRPS:
        add(out, s, phrase(CHIRP_COURSE, db - .5, waver=.018))
        add(out, s, phrase(under_voice, db + UNDER_VOICE_DB, waver=.05))
    return out + undb(-2.5) * scatter(out, 0.016)


def wings():
    """Flight feathers flutter and rasp in a rush of air on each stroke; a low wake rolls on between strokes."""
    flutter, air, lift, wake = np.zeros((4, N))
    t = np.arange(-SR // 10, SR // 5) / SR
    for s, db, length, hz, air_db in STROKES:
        pitch = hz * (1 - 2.51 * t + 0.046 * walk(158.4, count=len(t)))
        swell = np.exp(-np.abs(t / (0.57 * length)) ** 3.9)
        add(flutter, s + t[0], undb(db + 0.5) * swell * np.sin(2 * np.pi * np.cumsum(pitch) / SR))
        add(air, s + t[0], undb(air_db) * np.exp(-((t + 0.0056) / 0.014) ** 2))
        # feathers rustle as the wing lifts
        add(lift, s + t[0], undb(air_db - 6) * np.exp(-((t - .042) / 0.028) ** 2))
        # the wake varies half as much in dB as the rush of air
        add(wake, s + t[0], undb(air_db / 2) * np.exp(-((t - .022) / 0.063) ** 2))
    started = np.clip((TIME - 8.53) / 0.0066, 0, 1)  # no wake ahead of the first stroke
    scrape = fibres(N, rate=2500, spread_db=-1)
    for _ in range(2):
        scrape = ring(scrape, RASP_HZ, RASP_WIDTH_HZ)
    rasp = undb(RASP_DB) * unit(scrape)
    rolling = undb(-26.5) * started * wake * noise(WAKE_COLOUR)
    return flutter + air * (noise(RUSH_COLOUR) + rasp) + lift * rasp + rolling


def scene():
    """Feeding ducks and wing strokes close by, birds and meadow behind."""
    colours = [response(c) for c in (STALK_COLOUR, TICK_COLOUR, HOLLOW_COLOUR)]
    around = meadow() + far_tones() + songbirds() + sparrows() + twitter()
    grass = stirred_grass(colours) + snaps(colours, SNAPS) + pings() + nibbles(colours)
    grass = grass + snaps(colours, strays())
    ducks = wings() + knocks() + grass + pops()
    return (ducks + around)[None]


def record(dry):
    """The recorder behind the microphone cuts the top with a steep low-pass."""
    return signal.sosfilt(signal.ellip(10, .2, 70, TOP_HZ, fs=SR, output="sos"), dry)


dry = scene()
out = record(dry)
inscribe(out)
```